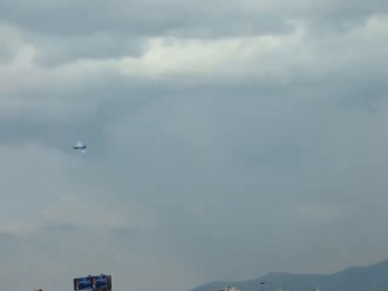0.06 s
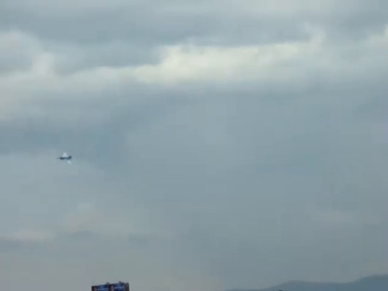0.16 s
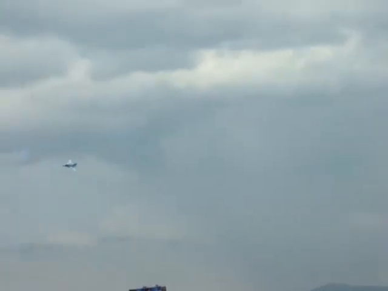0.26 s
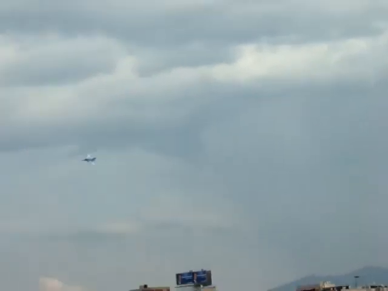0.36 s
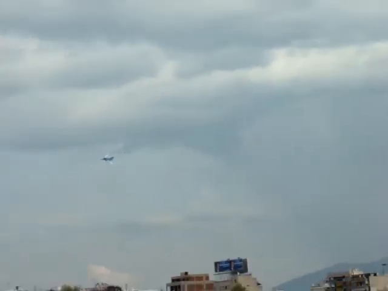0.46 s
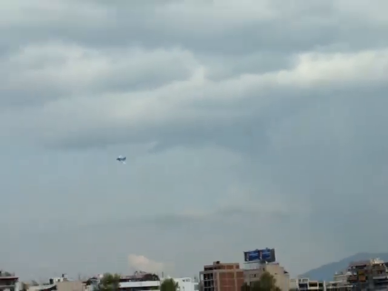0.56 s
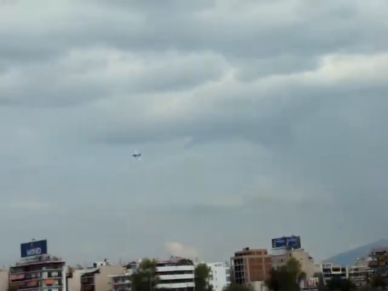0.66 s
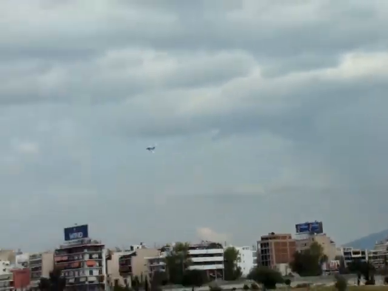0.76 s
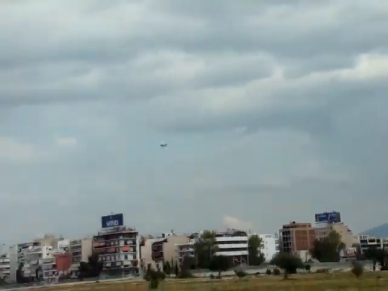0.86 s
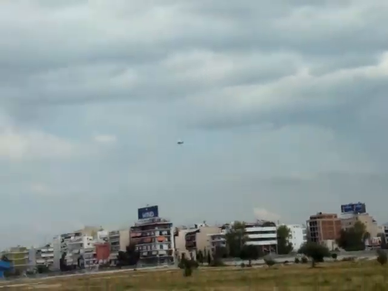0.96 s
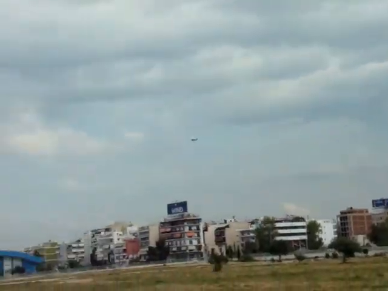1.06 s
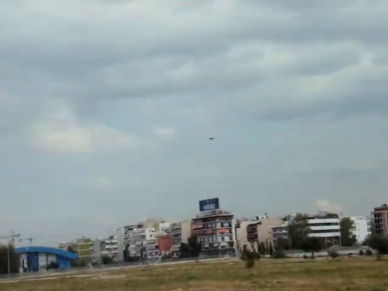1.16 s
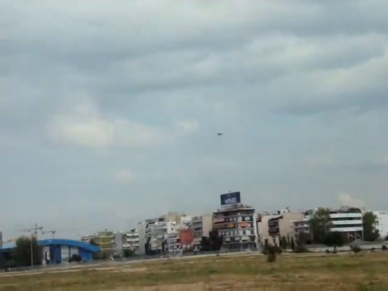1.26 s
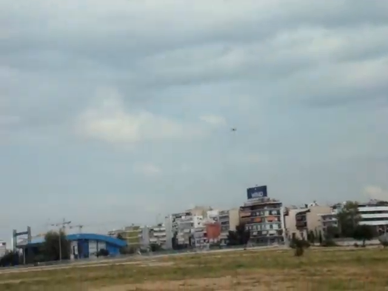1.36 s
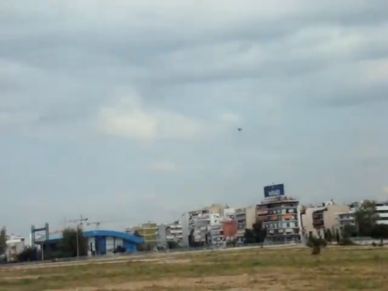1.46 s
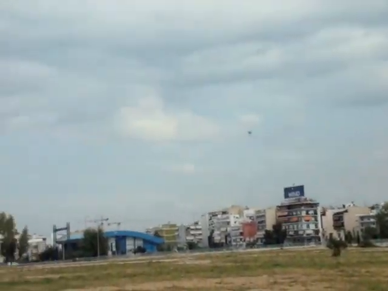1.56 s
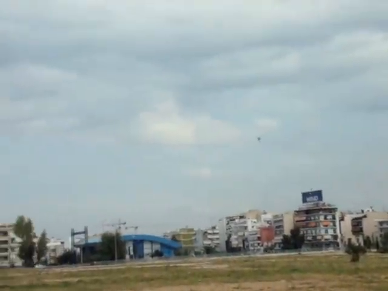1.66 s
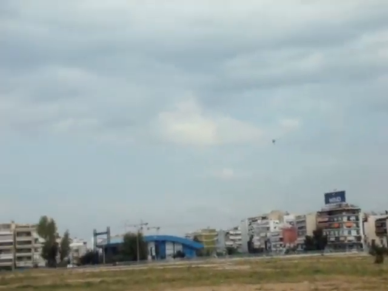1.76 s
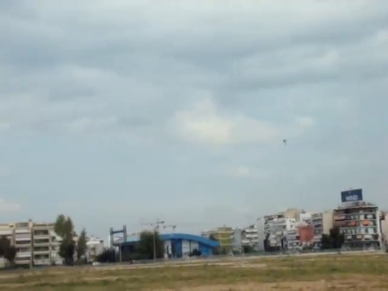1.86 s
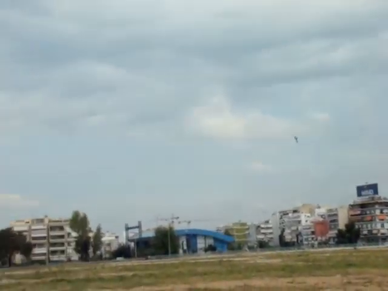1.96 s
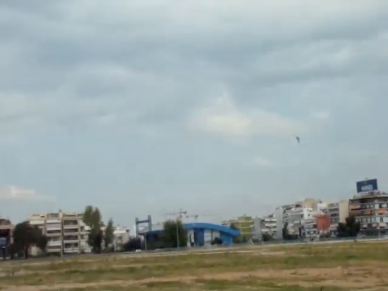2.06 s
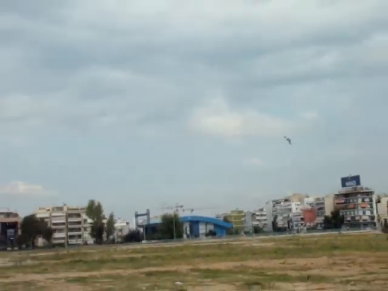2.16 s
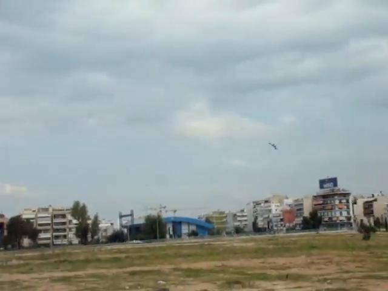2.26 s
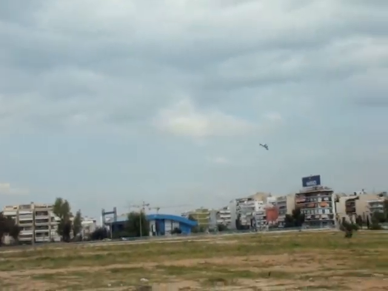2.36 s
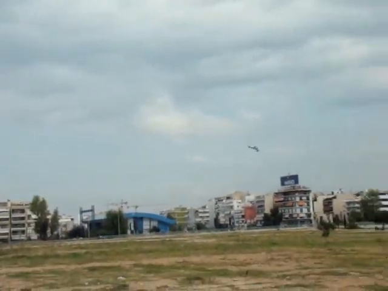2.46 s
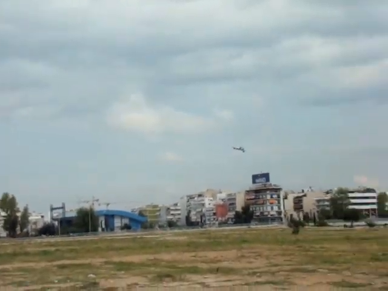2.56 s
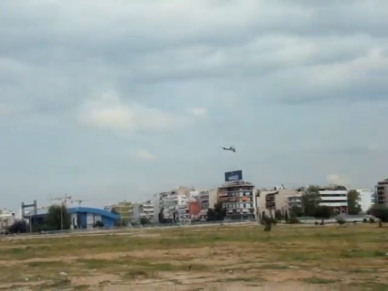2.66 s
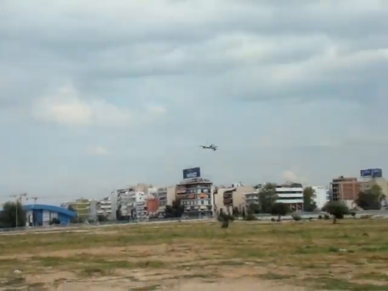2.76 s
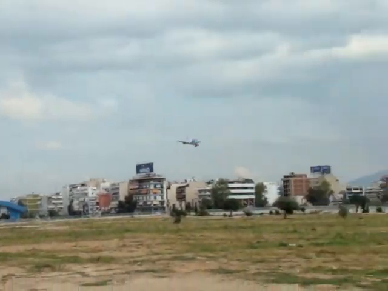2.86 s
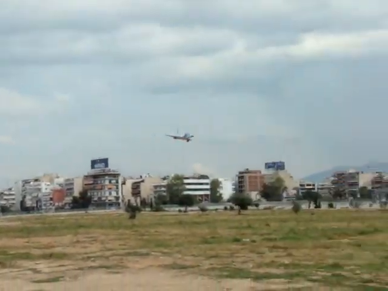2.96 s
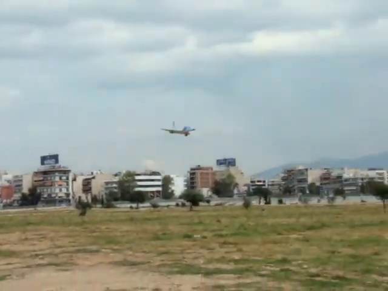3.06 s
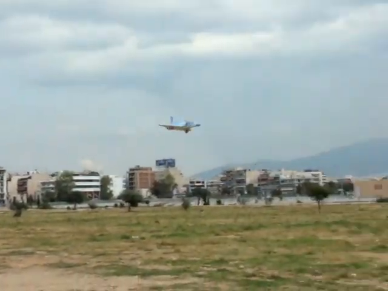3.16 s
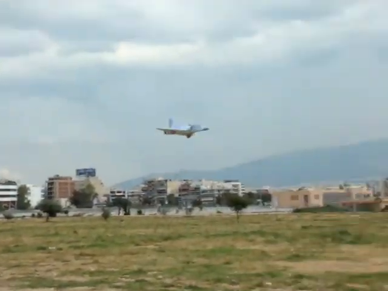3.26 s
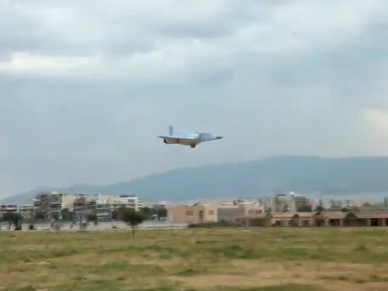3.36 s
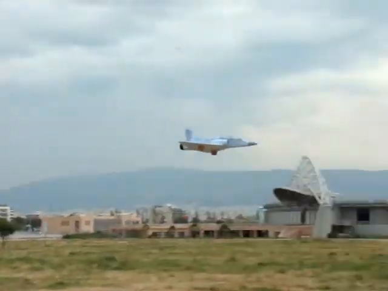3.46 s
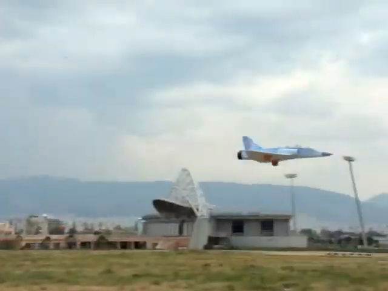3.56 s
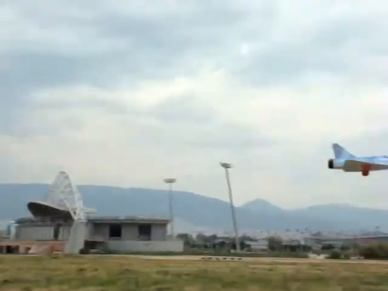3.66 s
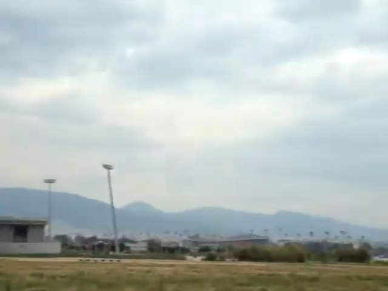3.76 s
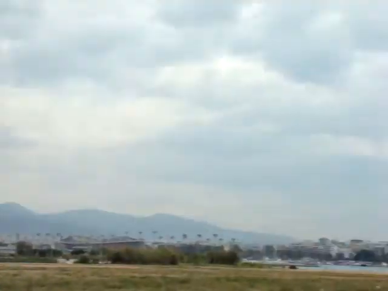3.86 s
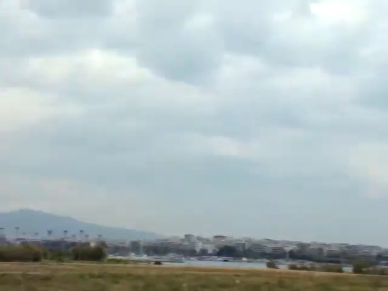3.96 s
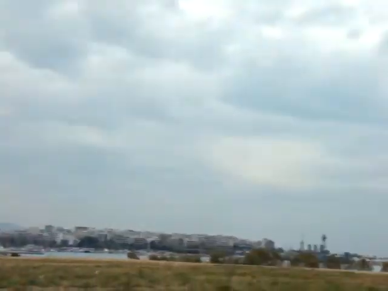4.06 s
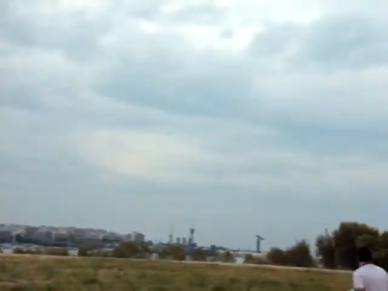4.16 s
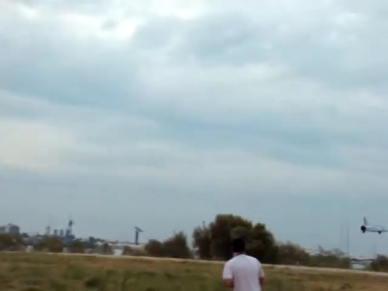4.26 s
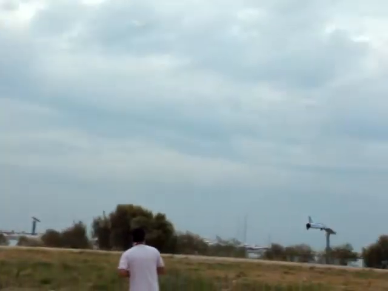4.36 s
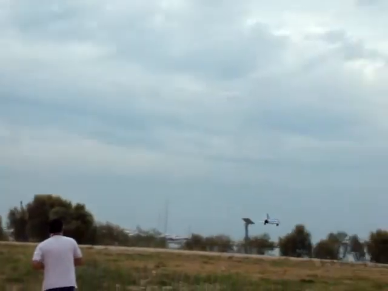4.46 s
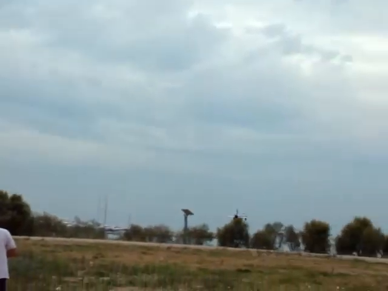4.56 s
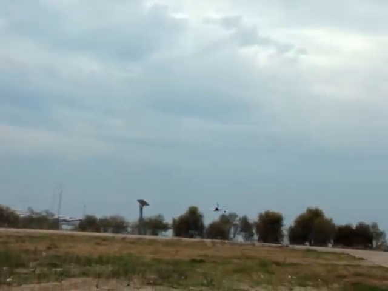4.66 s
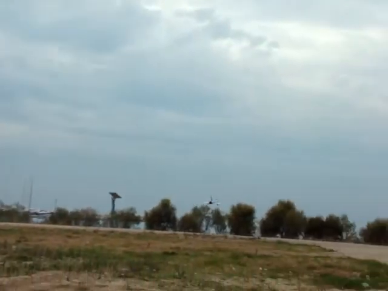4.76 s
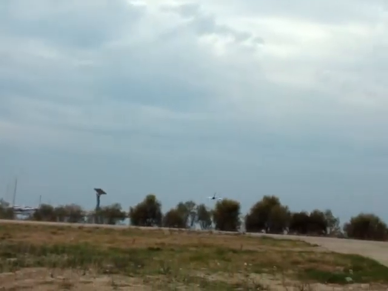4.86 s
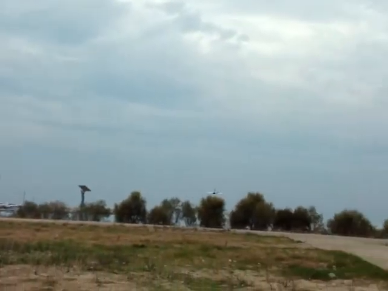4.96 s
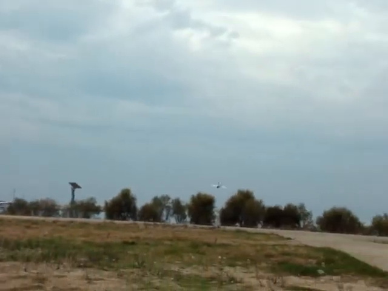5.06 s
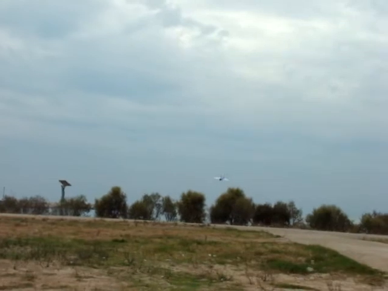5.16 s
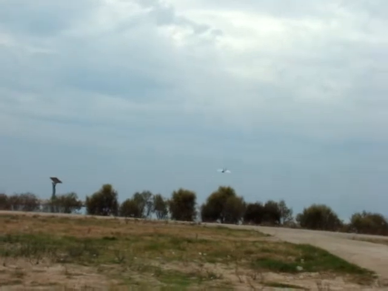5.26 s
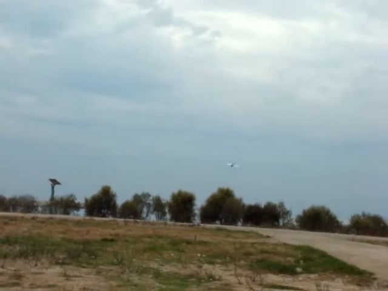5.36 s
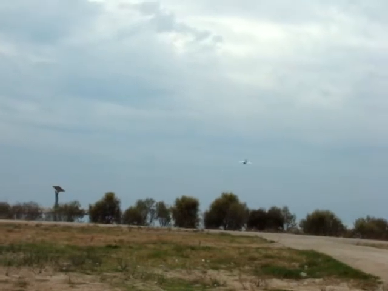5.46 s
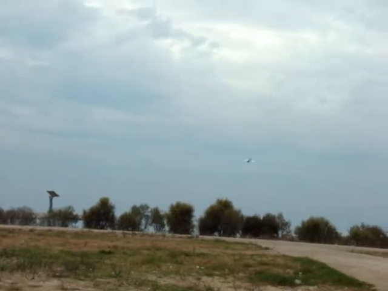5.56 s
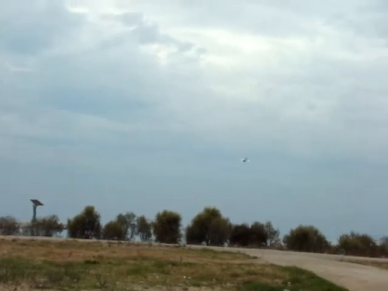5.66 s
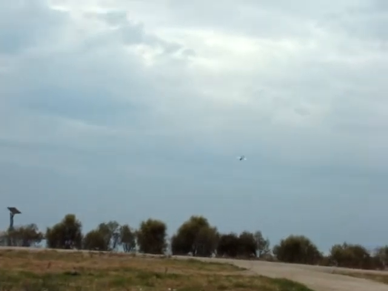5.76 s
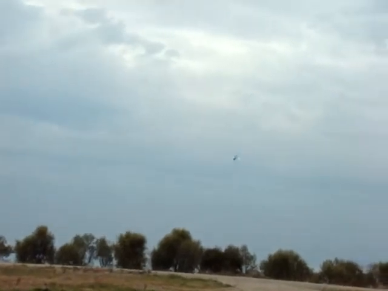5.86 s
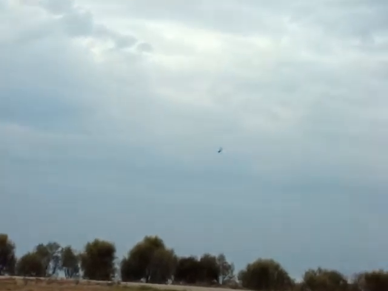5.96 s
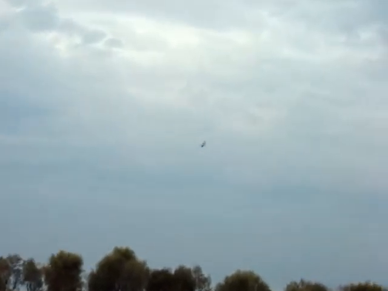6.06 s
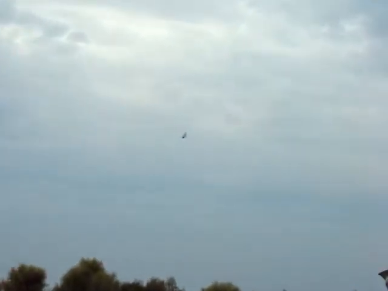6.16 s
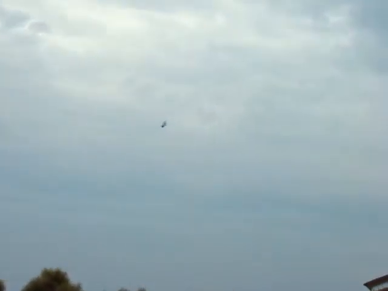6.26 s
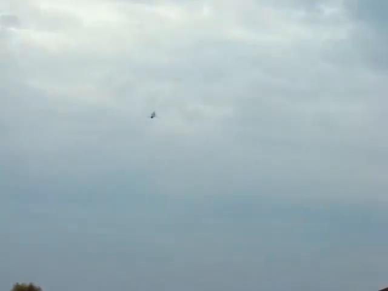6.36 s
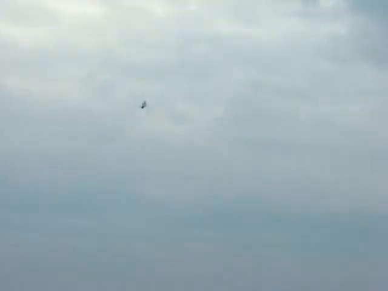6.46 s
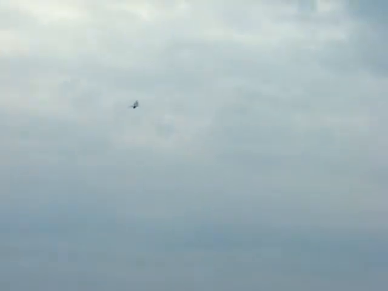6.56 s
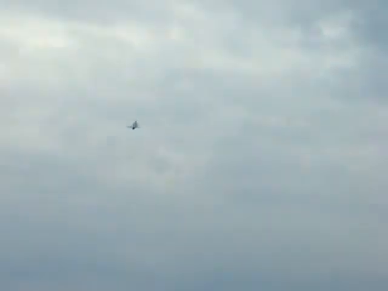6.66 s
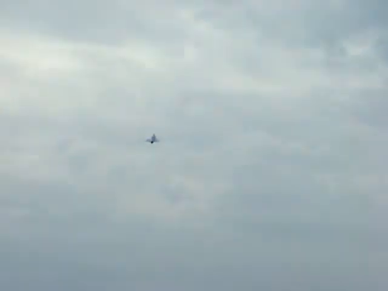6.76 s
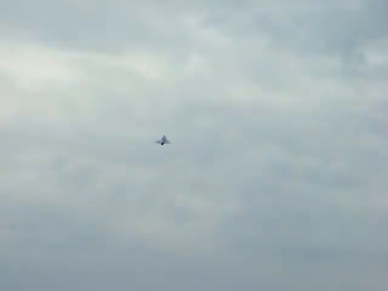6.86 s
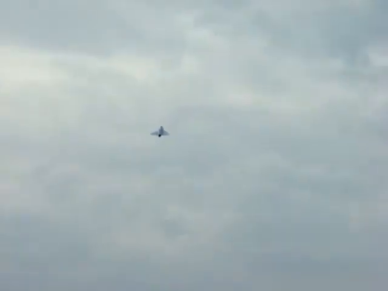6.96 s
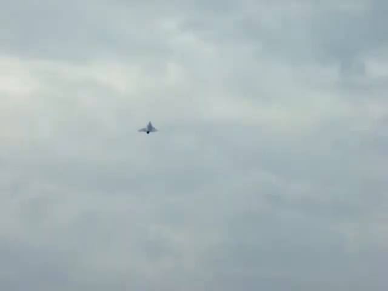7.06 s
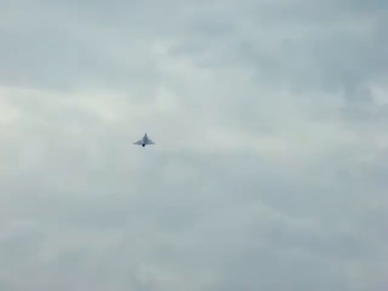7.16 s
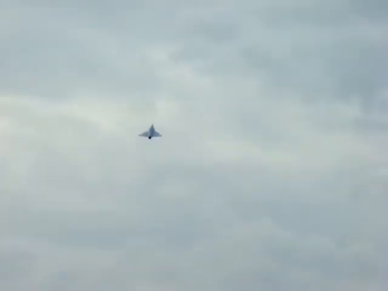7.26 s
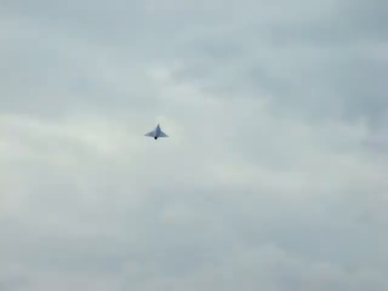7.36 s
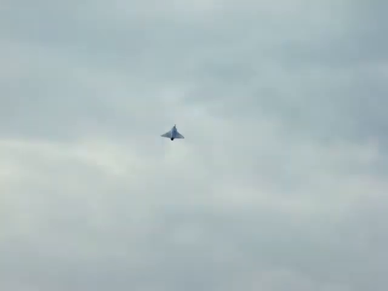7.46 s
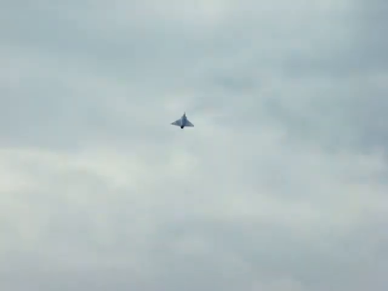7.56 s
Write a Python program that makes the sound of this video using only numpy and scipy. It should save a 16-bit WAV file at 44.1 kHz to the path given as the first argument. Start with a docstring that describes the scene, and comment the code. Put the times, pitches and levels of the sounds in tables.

```python
"""A whining model jet turns in, races low over an open field and climbs away, its pitch falling as it passes.
Its five-bladed electric fan sings over air rushing through the duct, the tube around the fan.
The pitch is high coming and low going (the Doppler effect), and the ground echoes the buzz and rush.
A town murmurs far away. The camera that listens is knocked twice, its lens motor hisses near the end,
and its gain control turns everything down while the jet is loudest."""
import sys
import numpy as np
from scipy import signal
from scipy.fft import rfft, irfft
from scipy.io import wavfile
from scipy.ndimage import uniform_filter1d, minimum_filter1d, map_coordinates

SR = 44100
rng = np.random.default_rng(int(sys.argv[2]) if len(sys.argv) > 2 else 0)


def transcribe(signal):
    """Save signal, clipped to [-1, 1], as a 16-bit WAV file at the path in sys.argv[1]."""
    frames = np.atleast_2d(signal).T
    limited = np.clip(frames, -1, 1)
    pcm = np.round(limited * 32767).astype(np.int16)
    wavfile.write(sys.argv[1], SR, pcm)


N = 335601
T = np.arange(N) / SR
FREQS = np.maximum(np.arange(N // 2 + 1) * SR / N, 1)
SPEED_M_S, PASS_S, CLOSEST_M = 36.7, 3.819, 14.94  # the jet's speed; when and how near it passes
SOUND_M_S = 343

# Tone colour of far traffic and breeze: pitch_hz, relative_db
TOWN_COLOUR = [(25, -26.5), (45, -15.5), (70, -5.5), (110, 0), (230, 2), (320, 1.5), (600, 1), (950, 3),
               (1400, -1.5), (2200, -0.5), (3500, -7.5), (6000, -12), (10000, -16)]
# Finger knocks on the camera: start_s, level_db
KNOCKS = [(.027, -15.5), (7.4534, -17)]
# How the camera body rings: pitch_hz, ring_s (time to fade by 60 dB), relative_db
BODY_RINGS = [(420, 0.05, -15.5), (995, 0.027, -6), (1520, 0.028, -8), (1650, .024, -15),
              (3730, 0.0085, -6)]
# The lens motor ticks, starts, runs and brakes: start_s, length_s, level_db
LENS_MOVES = [(0.183, 0.0065, -37), (6.861, 0.025, -25.5), (7.013, 0.078, -34), (7.115, 0.13, -32.5),
              (7.322, 0.022, -27.5)]
# A gust hits the microphone as the camera swings after the jet: peak_s, half_width_s, level_db
GUST = (3.18, 0.16, -45.5)
# The level dips briefly as the lens starts to move: middle_s, half_width_s, change_db
LEVEL_DIP = (6.872, .011, -10)

# The jet dives, runs low and climbs: time_s, height_m
HEIGHT = [(0, 22), (1, 17.1), (2, 9.36), (3.2, 4.34), (4.3, 3.86), (4.65, 3.33), (5.1, 3.82), (5.5, 6),
          (6, 12.3), (7.61, 41)]
# Which side of the jet faces the listener: time_s, angle_deg (0 is the nose, 180 the tail)
VIEW_ANGLE = [(0, 111), (.45, 81), (.85, 51), (1.4, 39), (1.8, 35.3), (2.33, 2.9), (2.68, 17.6), (3.05, 33),
              (3.35, 61.6), (3.68, 91), (4.2, 148.3), (4.5, 183), (5.3, 176), (6.8, 149.5), (7.61, 146)]
# The fan's pitch climbs slowly, including the jet's turn toward us:
# time_s, pitch_hz (before the drop of the fast pass)
FAN_PITCH = [(0, 470.2), (1, 487.1), (1.7, 495.6), (2.5, 501.1), (3.3, 504.6), (4.3, 517.8), (5.7, 521.9),
             (6.4, 525.2), (7.61, 527.9)]

# Pitches the rushing air rings at, before they slide with the fan: pitch_hz, width_hz, relative_db
ROAR_BANDS = [(362, 120, -8.5), (614, 540, 1.5), (1035, 370, 2), (1680, 880, -2.5)]
SWIRL_BANDS = [(2605, 406, 0)]
INTAKE_BANDS = [(3430, 900, -2), (4130, 460, -0.5), (4850, 1000, -8.5), (5640, 270, -4), (6620, 1180, 2),
                (7700.0, 1020.0, -3), (8950, 840, 1.5)]
NOZZLE_BANDS = [(3200, 590, -2), (4180, 1000, -0.5), (4970, 720, -0.5), (5900, 440, -13), (6560, 1160, 0.5),
                (7740, 1200, -2), (9000, 1000, 1.5), (9900, 1500, -3.5)]
# How much the air soaks up roar, swirl, rush and hiss, in that order: loss_db_per_m
AIR_LOSS = [.005, 0.032, 0.0072, 0.027]
# How loud each sound is from each side of the jet, at the closest distance: angle_deg, level_db
ROAR_SPREAD = [(0, -31), (40, -30), (85, -26.5), (130, -32), (180, -37.5)]
SWIRL_SPREAD = [(0, -21.5), (40, -17.5), (90, -24), (180, -26)]
RUSH_SPREAD = [(0, -29), (13, -23.5), (24, -20), (36, -18.5), (52, -25.5), (90, -28), (120, -23),
               (150, -23), (180, -22)]
HISS_SPREAD = [(0, -20), (16, -23), (34, -23.5), (65, -21.5), (90, -27.5), (120, -21.5), (150, -17.5),
               (180, -18.5)]
BUZZ_SPREAD = [(0, -35), (40, -35.5), (90, -34), (150, -34), (180, -38)]
WHISTLE_SPREAD = [(0, -45), (62, -31.5), (90, -42), (130, -36), (180, -34)]
OCTAVE_SPREAD = [(0, -41.5), (20, -33.5), (45, -26), (60, -39.5), (78, -37.5), (180, -35)]

# Buzz of unequal blades, then overtones of the blade whine: spin_multiple, relative_db
BUZZ_TONES = {3: -3.2, 4: 0.39, 6: -7, 7: -3, 8: -15}
WHISTLE_TONES = {10: -0.91, 15: -18, 20: -9.5}
# Narrow beams of single fan tones: peak_s, spin_multiple, half_width_s, level_db
BEAMS = [(3.14, 10, .037, -34.5), (3.255, 3, 0.046, -35), (3.275, 2, 0.088, -23.5), (3.306, 10, .037, -36),
         (3.324, 1, .08, -18), (3.436, 5, 0.036, -16), (3.466, 2, 0.11, -19), (3.484, 3, .037, -28),
         (3.48, 6, 0.045, -27.5), (3.51, 4, .037, -27), (3.655, 5, 0.047, -12.5), (3.655, 6, .037, -29),
         (3.685, 4, .037, -22), (3.728, 2, 0.12, -29), (3.76, 3, 0.048, -25), (3.85, 6, 0.044, -29),
         (3.88, 5, 0.2, -19), (3.988, 10, .037, -28), (4.06, 3, .037, -37), (4.135, 10, 0.023, -24.5),
         (4.22, 10, 0.022, -28.5), (4.514, 2, 0.33, -32)]
# The blade whine swells and fades on its way through the air: time_s, level_db
WHINE_LEVEL = [(0.0, -36), (0.12, -50), (0.21, -32.5), (0.49, -30.5), (0.61, -37.5), (1.04, -20),
               (1.29, -22.5), (1.59, -30.5), (1.84, -24), (2.18, -35.5), (2.63, -18), (2.96, -35),
               (3.14, -17.5), (3.37, -28), (3.39, -22), (3.66, -12), (4.24, -26.5), (4.39, -17.5),
               (4.6, -26), (4.66, -19), (4.83, -26), (6.44, -36.5), (7.18, -35), (7.61, -39.5)]


def undb(db):
    """Turn decibels into a number to multiply a sound by."""
    return 10 ** (np.asarray(db) / 20)


def curve(table):
    """Join a table's (time, value) points with straight lines."""
    return np.interp(T, *np.transpose(table))


def bump(peak_s, half_width_s):
    """A smooth rise to 1 and fall back to 0."""
    return np.exp(-((T - peak_s) / half_width_s) ** 2)


def wander(rate_hz):
    """A smooth random drift, about 1 in size."""
    step = int(SR / rate_hz)
    stairs = np.repeat(rng.standard_normal(N // step + 1), step)
    smooth = uniform_filter1d(uniform_filter1d(stairs, step), step)[:N]
    return smooth / smooth.std()


def noise(gain):
    """Noise of strength 1, coloured by a gain for each frequency."""
    coloured = irfft(rfft(rng.standard_normal(N)) * gain, N)
    return coloured / coloured.std()


def peaks(bands):
    """A gain for each frequency, with a steep peak at each band."""
    return np.sqrt(sum(undb(db) ** 2 / (1 + ((FREQS ** 2 - hz ** 2) / (FREQS * width)) ** 2) ** 2
                       for hz, width, db in bands))


def read(sound, place):
    """Play a sound from moving positions, even between its samples."""
    return map_coordinates(sound, [place], order=3, mode="mirror")


def flight():
    """Distance in metres and Doppler pitch factor for a straight, fast pass."""
    along_m = SPEED_M_S * (T - PASS_S)
    distance_m = np.hypot(along_m, CLOSEST_M)
    return distance_m, 1 / (1 + SPEED_M_S / SOUND_M_S * along_m / distance_m)


def heard_db(spread, loss_db_per_m=0):
    """A sound's level depends on which side of the jet we see, and drops with distance."""
    distance_m, _ = flight()
    side_db = np.interp(curve(VIEW_ANGLE), *np.transpose(spread))
    return side_db + 20 * np.log10(CLOSEST_M / distance_m) - loss_db_per_m * (distance_m - CLOSEST_M)


def town(traffic_db=-36, drone_db=-46, drone_hz=156, fade_s=0.58):
    """Far traffic murmurs steadily while one engine drone dies away."""
    hz, colour_db = np.transpose(TOWN_COLOUR)
    colour = undb(np.interp(np.log(FREQS), np.log(hz), colour_db))
    traffic = undb(traffic_db + 0.87 * wander(4.6)) * noise(colour)
    cycle = 2 * np.pi * np.cumsum(drone_hz * (1 + 0.01 * wander(6.8))) / SR
    drone = sum(np.sin(k * cycle) for k in range(1, 4))
    return traffic + undb(drone_db + 3.6 * wander(10)) * bump(0, fade_s) * drone


def finger_knocks():
    """Each knock makes the camera body ring for a moment."""
    knocks = 0
    for start_s, level_db in KNOCKS:
        age_s = np.maximum(T - start_s, 0)
        for hz, ring_s, db in BODY_RINGS:
            fade = undb(level_db + db - 60 * age_s / ring_s)
            knocks += fade * np.sin(2 * np.pi * hz * age_s)
    return knocks


def lens_motor(rattle=0.39, rise_s=0.0017, fall_s=0.0057):
    """The lens motor gives a thin, rattling hiss while it moves."""
    running = sum(undb(db) * np.clip((T - start) / rise_s, 0, 1)
                  * np.clip((start + length - T) / fall_s, 0, 1) for start, length, db in LENS_MOVES)
    shake = 1 + rattle * np.tanh(wander(130))
    hiss = noise(peaks([(9640, 670, 5.0), (7700, 3100, -3), (4200, 3500, -8.0)]))
    return running * shake * hiss


def microphone_wind(swing_db=-64):
    """Air rumbles on the microphone as the camera swings after the jet."""
    peak_s, half_width_s, gust_db = GUST
    swing = (CLOSEST_M / flight()[0]) ** 2  # fastest when the jet is closest
    wind = undb(gust_db) * bump(peak_s, half_width_s) + undb(swing_db) * swing
    return wind * undb(1.5 * wander(15)) * noise(peaks([(95, 92, 0), (205, 110, -2)]))


def add_ground_echo(sound, share=0.35, mic_height_m=1.485, dull_hz=6500):
    """The field returns a duller copy; its changing delay gives a sweeping whoosh."""
    delay_s = 2 * curve(HEIGHT) * mic_height_m / flight()[0] / SOUND_M_S
    echo = irfft(rfft(sound) / np.sqrt(1 + (FREQS / dull_hz) ** 2), N)
    return sound + share * read(echo, (T - delay_s) * SR)


def duct_air(fan_hz, rest_hz=512, split_hz=6000, nozzle_deg=72, blend_deg=26, build_s=0.35):
    """Churning air makes the duct ring; the noise slides up and down with the fan's pitch."""
    place = np.cumsum(fan_hz) / rest_hz
    # We hear the intake from ahead and the nozzle from behind.
    behind = (1 + np.tanh((curve(VIEW_ANGLE) - nozzle_deg) / blend_deg)) / 2
    low = 1 / np.sqrt(1 + (FREQS / split_hz) ** 16)
    high = np.sqrt(1 - low ** 2)
    rush, hiss = (np.sqrt(1 - behind) * read(noise(band * peaks(INTAKE_BANDS)), place)
                  + np.sqrt(behind) * read(noise(band * peaks(NOZZLE_BANDS)), place)
                  for band in (low, high))
    roar = read(noise(peaks(ROAR_BANDS)), place)
    swirl = read(noise(peaks(SWIRL_BANDS)), place)
    build_up = undb(-31.5 * np.exp(-T / build_s))  # rush and hiss start weak and grow
    layers = (roar, swirl, build_up * rush, build_up * hiss)
    levels_db = map(heard_db, (ROAR_SPREAD, SWIRL_SPREAD, RUSH_SPREAD, HISS_SPREAD), AIR_LOSS)
    gusts = undb(-0.3 * wander(11))
    return gusts * sum(undb(db + wander(35)) * layer for layer, db in zip(layers, levels_db))


def fan_buzz(turn, flutter_db=1.2, wobble_rad=0.16):
    """Slightly unequal blades buzz at multiples of the spin rate; the whine's overtones whistle above."""
    buzz = 0
    for tones, spread in ((BUZZ_TONES, BUZZ_SPREAD), (WHISTLE_TONES, WHISTLE_SPREAD)):
        level_db = heard_db(spread)
        for multiple, db in tones.items():
            gain = undb(level_db + db + flutter_db * wander(18))
            buzz += gain * np.sin(multiple * turn + wobble_rad * wander(35))
    return np.sqrt(2) * buzz


def fan_beams(turn, wobble_rad=0.054):
    """Beams of fan tone sweep over the listener; churning air shakes the higher ones more."""
    shaken = turn + wobble_rad * wander(90)
    return np.sqrt(2) * sum(undb(db) * bump(peak_s, half_width_s) * np.cos(multiple * shaken)
                            for peak_s, multiple, half_width_s, db in BEAMS)


def fan_tones(turn, blades=5, hum_db=-12.0, tail_db=-9, leak=0.039, wobble_rad=0.13):
    """The off-balance fan hums at its spin rate and an octave up; its blades whine in fluttering air."""
    near = CLOSEST_M / flight()[0]
    angle = np.radians(curve(VIEW_ANGLE))
    tail_fade = undb(tail_db * np.maximum(-np.cos(angle), 0))
    sideways = np.hypot(np.sin(angle) * tail_fade, leak)  # the hum almost vanishes at nose and tail
    hum = near * sideways * undb(hum_db + 0.02 * wander(30)) * np.sin(turn)
    flutter_db = 0.58 + 1.66 * near ** 2  # the fan's beams race past when the jet is close
    octave = undb(heard_db(OCTAVE_SPREAD) + flutter_db * wander(20)) * np.sin(2 * turn)
    whine_gain = undb(curve(WHINE_LEVEL) + flutter_db * wander(45))
    whine = whine_gain * np.sin(blades * turn + wobble_rad * wander(60))
    return np.sqrt(2) * (hum + octave + whine)


def scene():
    """Jet, town and camera noises meet at one microphone."""
    _, doppler = flight()
    fan_hz = curve(FAN_PITCH) * doppler
    turn = 2 * np.pi * np.cumsum(fan_hz) / SR  # the fan's angle as heard, in radians
    tones = fan_tones(turn) + fan_beams(turn)
    whoosh = add_ground_echo(fan_buzz(turn) + duct_air(fan_hz))
    dip_s, half_width_s, dip_db = LEVEL_DIP
    dip = undb(dip_db * bump(dip_s, half_width_s))
    mono = dip * (tones + whoosh + town()) + finger_knocks() + lens_motor() + microphone_wind()
    return np.array([mono, mono])


def record(dry, limit_db=-14.0, hold_s=0.32, release_s=0.71, top_hz=10020):
    """Gain control turns loud sound down at once, waits, then recovers slowly; the top treble is cut."""
    level_db = 10 * np.log10(uniform_filter1d(dry[0] ** 2, int(.05 * SR)) + 1e-12)
    hold, release = int(hold_s * SR) | 1, int(release_s * SR) | 1  # odd numbers of samples
    held_db = minimum_filter1d(np.minimum(limit_db - level_db, 0), hold, origin=hold // 2)
    gain_db = np.minimum(held_db, uniform_filter1d(held_db, release, origin=release // 2))
    treble_cut = signal.ellip(14, .2, 80, top_hz, fs=SR, output="sos")
    return signal.sosfilt(treble_cut, dry * undb(gain_db))


dry = scene()
out = record(dry)
transcribe(out)
```